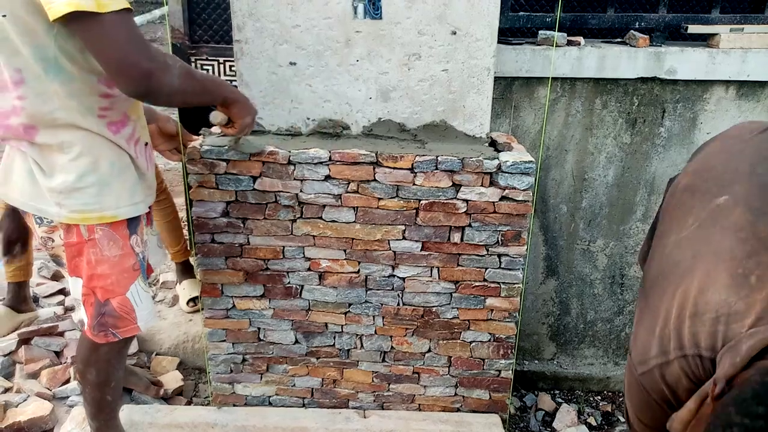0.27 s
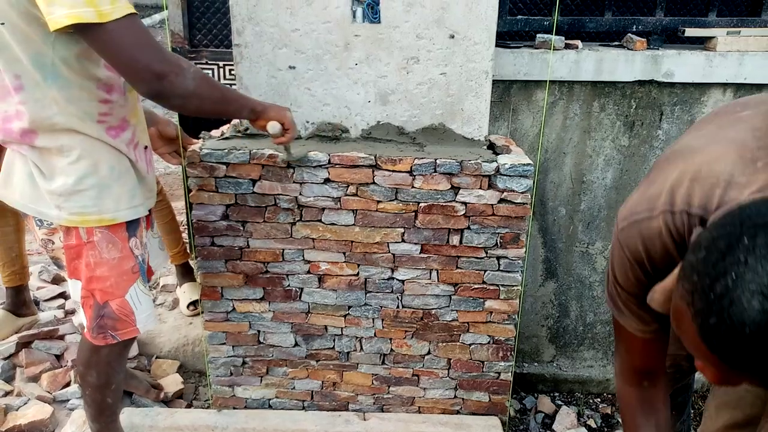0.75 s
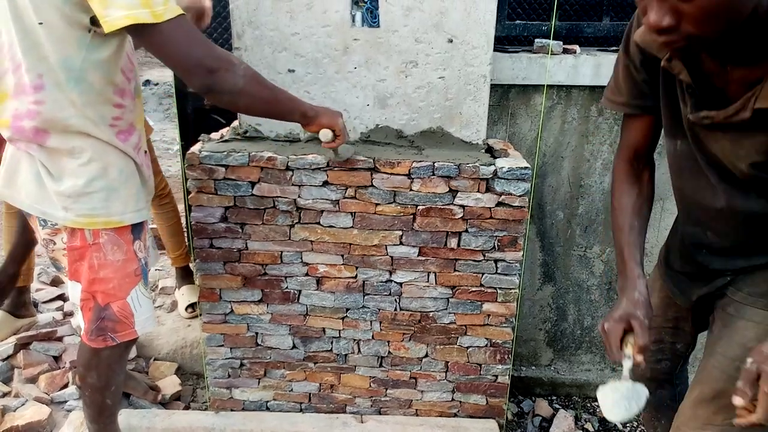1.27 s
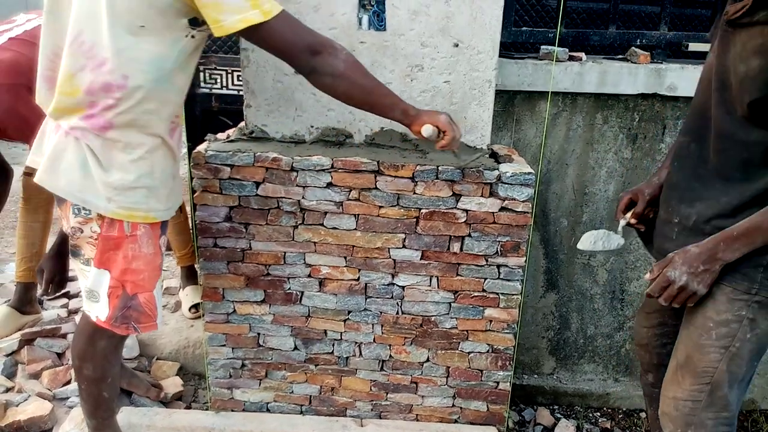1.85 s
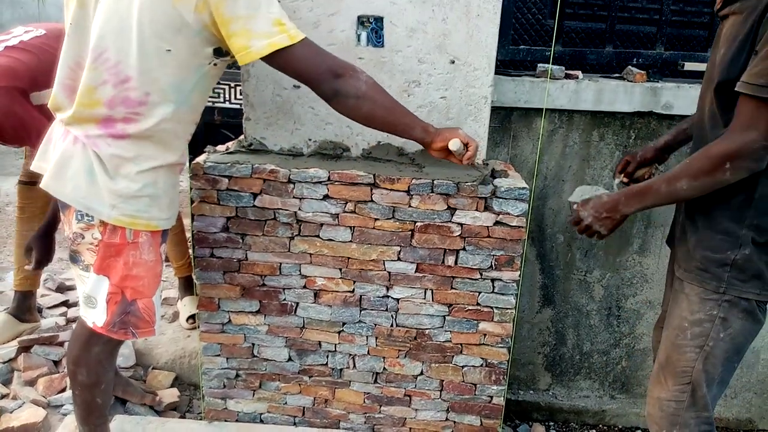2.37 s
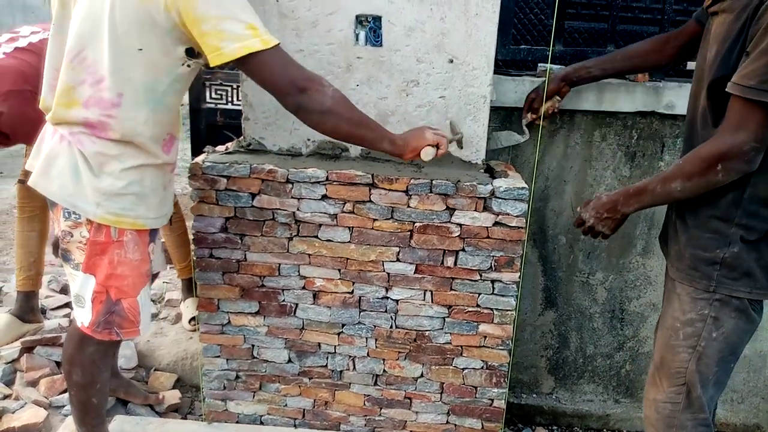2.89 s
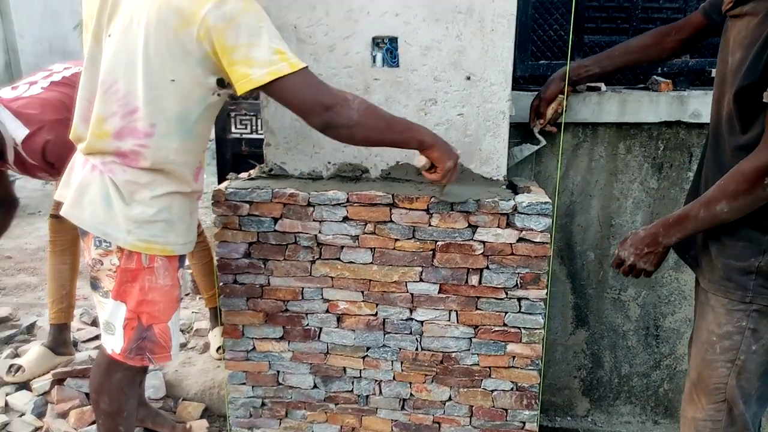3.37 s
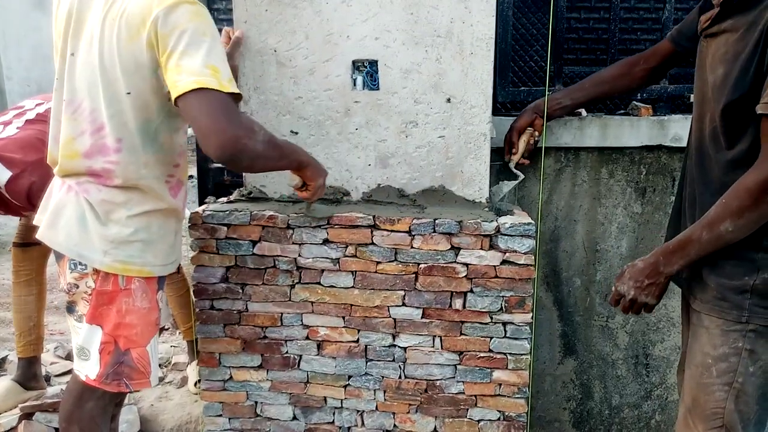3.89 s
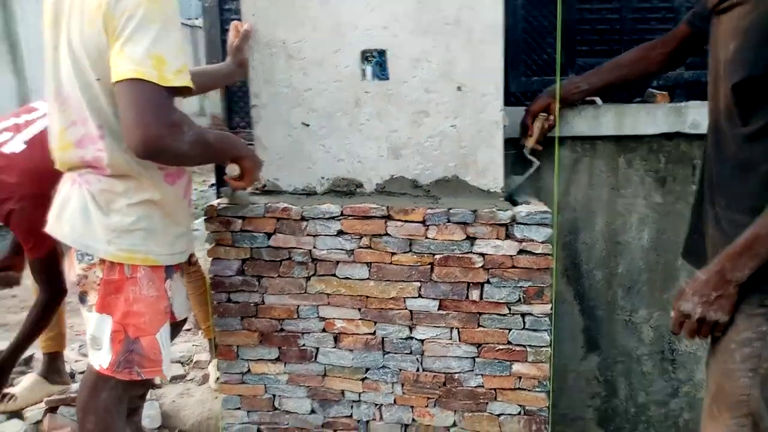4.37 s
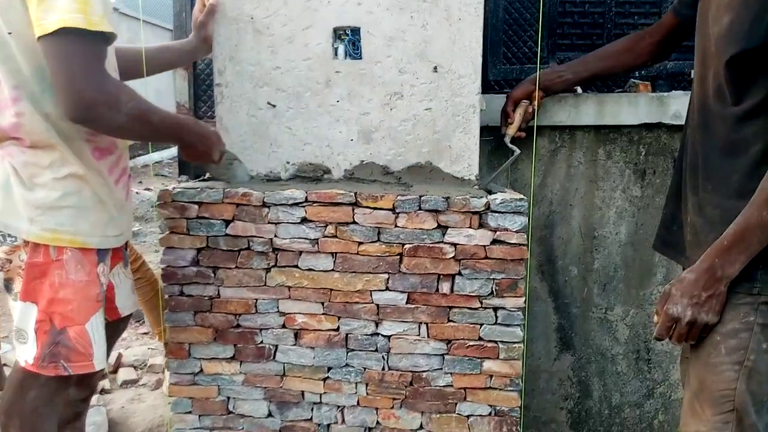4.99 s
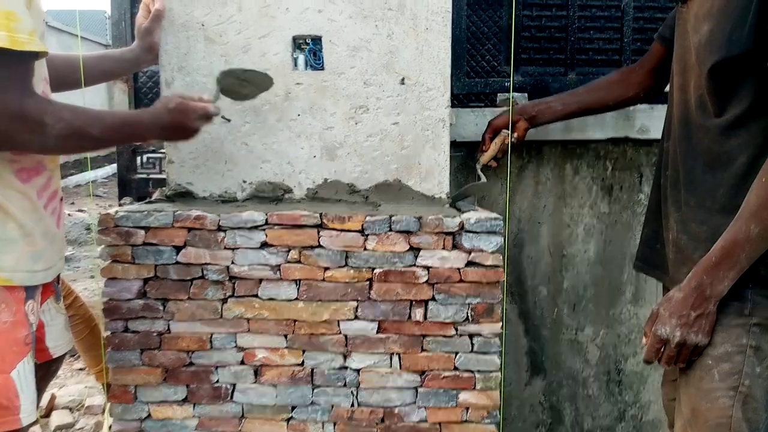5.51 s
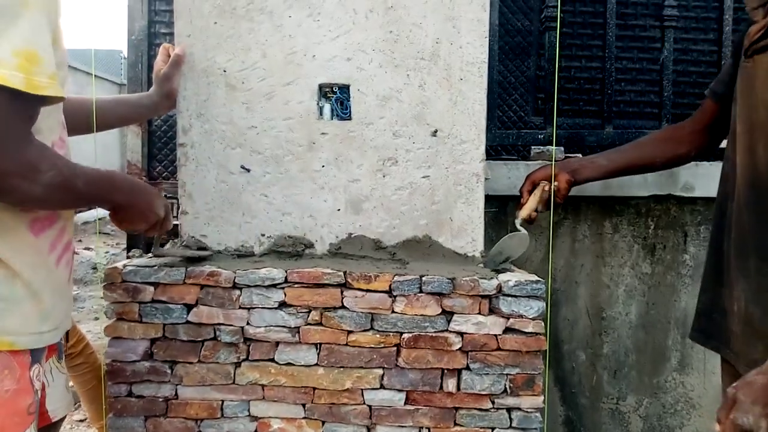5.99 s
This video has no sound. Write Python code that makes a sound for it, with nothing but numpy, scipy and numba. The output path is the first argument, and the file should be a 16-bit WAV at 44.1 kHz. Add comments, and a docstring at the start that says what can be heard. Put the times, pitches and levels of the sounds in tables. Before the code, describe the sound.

Close by in a walled yard, a steel trowel sweeps and scrapes through wet, sandy mortar, and lumps plop. After a second, steel taps on stone about three times a second, including four hard blows with a bright echo. Loose stones clack and one rocks with a clunk. Near the end the blade rings and squeaks over bare stone. Small birds chirp, faint bleats come late, and wind rumbles on the microphone.

```python
"""A walled yard; low wind buffets and handling thumps rumble on the stereo microphone. Close by, a mason
works mortar along a stone-clad pillar: his steel trowel sweeps the paste and bites into sand; lumps plop.
After a second, steel taps on stone about three times a second and small birds chirp farther off. Four
hard blows duck the limiter, each leaving a bright echo, while loose stones clack and one rocks with a
clunk. Late on come faint, distant bleats, and the blade sings and squeaks as it drags over bare stone."""
import sys
import numpy as np
from scipy import signal
from scipy.fft import rfft, irfft
from scipy.io import wavfile
from scipy.ndimage import uniform_filter1d
from numba import njit

SR = 44100
rng = np.random.default_rng(int(sys.argv[2]) if len(sys.argv) > 2 else 0)


def file_out(sig):
    """Save sig as 16-bit WAV at sys.argv[1]."""
    # one column per channel
    cols = np.atleast_2d(sig).T
    # limit, then scale
    lim = np.clip(cols, -1, 1)
    pcm = np.round(lim * 32767).astype(np.int16)
    wavfile.write(sys.argv[1], SR, pcm)


N = 275625
TIME = np.arange(N) / SR

# Hard blows on the masonry. Each row: start in seconds, relative level in dB, body over hiss in dB,
# level of the bright echo in dB, extra on its lowest band in dB.
BLOWS = [(1.5, -1.5, -6, -47, -4), (2.284, 0.5, -1.5, -23.5, -12), (3.043, 0, -4, -25.5, 4.5),
         (3.777, 4, -5, -28, -3)]


def undb(db):
    """Decibels to gain."""
    return 10 ** (np.asarray(db) / 20)


def unit(x):
    """Scale to rms 1."""
    return x / np.sqrt(np.mean(x ** 2))


def curve(rows):
    """Join (seconds, value) rows by straight lines."""
    return np.interp(TIME, *np.transpose(rows))


def add(track, s, sound):
    """Mix a sound into a track from s seconds on."""
    i = int(s * SR)
    track[..., i:i + sound.shape[-1]] += sound[..., :N - i]


def excerpt(x, s, samples):
    """A stretch of a signal from s seconds on."""
    return x[..., int(s * SR):][..., :samples]


def butter(x, order, hz, kind):
    """Butterworth filter."""
    return signal.sosfilt(signal.butter(order, hz, kind, fs=SR, output="sos"), x)


def convolve(x, response):
    """Pass each channel through a response."""
    return signal.fftconvolve(np.atleast_2d(x), np.atleast_2d(response), axes=-1)[:, :x.shape[-1]]


def colour(x, points, size=2048):
    """Causal filter of unit energy with the given (Hz, dB) shape."""
    hz, db = np.transpose(points)
    bin_hz = np.arange(size // 2 + 1) * SR / size
    log_gain = np.log(undb(np.interp(np.log(bin_hz + 1), np.log(hz), db)))
    cepstrum = irfft(log_gain)[:size // 2]
    cepstrum[1:] *= 2
    response = irfft(np.exp(rfft(cepstrum, size)))
    return convolve(x, response / np.linalg.norm(response))


def walk(rate):
    """Random drift of rms 1 that turns about `rate` times a second."""
    k = int(SR / rate)
    return unit(uniform_filter1d(np.repeat(rng.standard_normal(N // k + 1), k), k)[:N])


def pan(db):
    """Gains of constant power, as a column; db is left minus right."""
    return unit(undb([[db / 2], [-db / 2]]))


def thuds(rows, cycles, attack, size=8192):
    """Soft impacts from (seconds, Hz, peak dB) rows: a damped swing that dies within a few cycles."""
    out, t = np.zeros(N), TIME[:size]
    for s, hz, db in rows:
        swing = np.sin(2 * np.pi * hz * t) * (1 - np.exp(-hz * t / attack)) * np.exp(-hz * t / cycles)
        add(out, s, undb(db) * swing / abs(swing).max())
    return out


def calls(rows, quaver, quaver_rate, sag=0.045, flutter_db=3):
    """One quavering, sinking partial for each (seconds, length, Hz, dB) row."""
    out = np.zeros(N)
    waver = 1 + quaver * walk(quaver_rate)
    for s, length, hz, db in rows:
        along = np.linspace(0, 1, int(length * SR))
        pitch = hz * excerpt(waver, s, len(along)) * (1 - sag * (along - .5))
        arch = np.sqrt(2 * abs(np.sin(np.pi * along)))
        add(out, s, undb(db) * arch * np.sin(2 * np.pi * np.cumsum(pitch) / SR))
    return out * undb(flutter_db * walk(30))


def outdoors(rumble_db=6, swell_db=2, apart=0.87):
    """Soft air, wind buffets and handling thumps, and a low rumble partly alike in both channels."""
    # Spectra of the air and the rumble. Each row: frequency in Hz, density in dB.
    air_colour = [(120, 0), (200, -8.5), (400, -11.5), (650, 5.5), (900, 0), (1200, 3), (2400, -6),
                  (4300, -7), (5700, -2), (7100, -2), (8200, -14.5), (10500, -36), (17000, -62)]
    rumble_colour = [(20, -47), (40, -21), (55, -1), (90, -5), (122, 3.5), (165, -5), (250, -22),
                     (500, -33), (2000, -83)]
    # Their rise and fall. Each row: time in seconds, relative level in dB.
    air_level = [(.2, -48.5), (1, -52), (1.14, -52), (1.28, -62), (1.9, -48), (2.8, -54), (4.4, -52),
                 (4.62, -53), (5.2, -51.5), (5.48, -50.5), (5.82, -50.5), (6.25, -48)]
    rumble_level = [(0.35, -61), (0.61, -55.5), (0.94, -62.5), (1.45, -51), (1.63, -62.5), (2.35, -61.5),
                    (2.9, -50.5), (3.17, -49.5), (3.64, -48), (3.95, -57), (4.21, -56), (4.31, -51),
                    (4.46, -66.5), (4.62, -64), (5.02, -52.5), (5.13, -58), (5.62, -61), (6.25, -60)]
    # Wind and handling on the microphone. Each row: start in seconds, pitch in Hz, relative peak in dB.
    thumps = [(1.05, 121, -36.5), (1.41, 107, -32), (1.945, 125, -35), (2.67, 136, -43), (3.1, 119, -33),
              (3.285, 120, -32), (3.47, 97, -31.5), (3.55, 110, -31), (4.635, 133, -37.5), (5.02, 124, -39),
              (5.08, 121, -35), (5.53, 130, -37), (6.12, 98, -38)]
    air = colour(rng.standard_normal((2, N)), air_colour)
    air *= undb(curve(air_level) + 2.1 * walk(8.7))
    noise = unit(rng.standard_normal(N) + apart * rng.standard_normal((2, N)))
    rumble = colour(noise, rumble_colour, size=16384)
    rumble *= undb(curve(rumble_level) + rumble_db + swell_db * walk(6.4))
    return air * pan(db=4.5) + (rumble + thuds(thumps, cycles=2.5, attack=0.49)) * pan(db=7)


def sand(rate, spread_db):
    """Grains crack one after another: many small, a few large."""
    place, size, sign = rng.random((int(rate * N / SR), 3)).T
    strength = np.minimum(-np.log(1 - size), 5)
    cracks = undb(spread_db * strength) * np.sign(sign - .5)
    return unit(np.bincount((place * N).astype(int), cracks, N))


def shifting(x, shift_db=3.5, size=512):
    """The contact moves from stone to stone, so resonances come and go within hundredths of a second."""
    spectra = signal.stft(x, nperseg=size)[2]
    patches = uniform_filter1d(rng.standard_normal(spectra.shape[1:]), size=6, axis=0)
    swell = unit(uniform_filter1d(patches, size=3, axis=1))
    return signal.istft(spectra * undb(shift_db * swell), nperseg=size)[1][:, :N]


def grit(rate, spread_db, shift_db=3.5):
    """Sand cracks under the damped blade; the channels share some grains and each has its own."""
    # Resonances of the pressed blade. Each row: frequency in Hz, width in Hz, gain in dB.
    pressed = [(1540, 72, -7), (2344, 190, -3), (2896, 76, -3.5), (3797, 150, -4.5), (6490, 410, -2)]
    # Spectrum of sand crushed under steel. Each row: frequency in Hz, density in dB.
    crushed = [(100, -26), (400, -35.5), (850, -10), (1180, -14), (1500, -7.5), (2300, -7.5), (3700, -6),
               (4700, -5.5), (5700, -0.5), (6800, -1), (7600, -11), (8600, -28), (15000, -39.5),
               (17000, -15)]
    shared = sand(rate, spread_db)
    grains = shifting(np.stack([shared + sand(rate, spread_db) for _ in range(2)]), shift_db)
    steel = sum(undb(db) * signal.lfilter(*signal.iirpeak(hz, hz / width, fs=SR), grains)
                for hz, width, db in pressed)
    return unit(colour(grains + steel, crushed))


def pressure(rise_s, hold_s, release_s):
    """One contact builds, holds and lets go."""
    t = TIME[:int((hold_s + 10 * release_s) * SR)]
    return (1 - np.exp(-t / rise_s)) * np.exp(-np.maximum(t - hold_s, 0) / release_s)


def tilt(x, body_db, split_hz=3300, shade_db=4.5):
    """Firm contact favours the body below the split, loose sand the hiss above; the body leans left."""
    low, high = butter(x, 3, split_hz, "low"), butter(x, 3, split_hz, "high")
    body, hiss = pan(body_db)
    return body * low * pan(shade_db) + hiss * high * pan(-shade_db)


def contact(grains, s, shape, body_db):
    """A stretch of grains, coloured by the firmness of the contact and shaped by its pressure."""
    sound = tilt(excerpt(grains, s, len(shape)), body_db)
    return unit(sound * shape[:sound.shape[1]]) * np.sqrt(np.mean(shape ** 2))


def slips(rate, decay_s, floor, spread_db=3):
    """Stick-slip: the steel lets go at uneven intervals, and each jerk dies away quickly."""
    gap, size = rng.standard_normal((int(2 * rate * N / SR), 2)).T
    when = (np.cumsum(np.exp(.5 * gap)) / rate * SR).astype(int)
    jerks = np.bincount(when, undb(spread_db * size), N)[:N]
    return unit(floor + signal.lfilter([1], [1, -np.exp(-1 / (decay_s * SR))], jerks))


def squelch(low_hz=230, high_hz=1150, count=2200, spread_db=2):
    """Tiny air pockets burst in the wet paste."""
    when, pitch, size = rng.random((count, 3)).T
    hz = low_hz * (high_hz / low_hz) ** pitch
    db = spread_db * np.minimum(-np.log(1 - size), 3)
    return unit(thuds(zip(when * N / SR, hz, db), cycles=1.26, attack=0.47, size=2048))


def smoothing(wobble_db=4):
    """The flat of the blade glides in jerks: firm sweeps rasp, loose ones hiss, the paste squelches."""
    # Each row: start and length in seconds, then crackle, firmness and squelch in dB.
    sweeps = [(0.137, 0.12, -40.5, -1.5, -57.5), (0.274, 0.13, -37.5, 1, -44.5),
              (0.412, 0.38, -36.5, 0.5, -52), (1.282, 0.11, -36.5, -1.5, -63), (1.538, 0.087, -34, 4, -68),
              (1.751, 0.13, -38, 4, -52.5), (1.926, 0.16, -51, 3, -55), (2.011, 0.25, -44.5, -1.5, -58),
              (2.34, 0.045, -35, 2.5, -55), (2.727, 0.054, -39.5, -2, -52.5),
              (2.966, 0.015, -45, -9, -41.5), (3.075, 0.1, -33, -2, -46), (3.204, 0.28, -39, -0.5, -60),
              (3.586, 0.25, -41.5, 0.5, -61), (3.797, 0.125, -29.5, 0.5, -44),
              (4.049, 0.1, -33.5, -1.5, -58), (4.37, 0.17, -56, 6.5, -54), (4.648, 0.2, -46, 2.5, -64),
              (5.072, 0.084, -45.5, 2.5, -54.5), (5.99, 0.04, -40.5, 3, -43), (6.07, 0.068, -38, 1, -64)]
    firm, loose, wet = controls = np.zeros((3, N))
    for s, length, crackle_db, firm_db, squelch_db in sweeps:
        strength = undb([[crackle_db + firm_db], [crackle_db - firm_db], [squelch_db]])
        add(controls, s, strength * pressure(rise_s=0.0071, hold_s=length, release_s=0.029))
    grains = grit(rate=7000, spread_db=3, shift_db=4)
    wobble = undb(wobble_db * walk(45))
    rasp = tilt(grains, body_db=37) * firm * wobble
    hiss = tilt(grains, body_db=-21.5) * loose / wobble
    crackle = (rasp + hiss) * slips(rate=70, decay_s=0.006, floor=0.3) / np.sqrt(2)
    return (crackle + wet * squelch()) * pan(db=7)


def strokes(gain_db=-1):
    """The edge sticks and slips as it bites into coarse sand."""
    # Each row: start and length in seconds, relative level in dB, body over hiss in dB.
    bites = [(0.196, 0.0041, -29, -9), (0.425, 0.0068, -19, -13), (0.438, 0.0086, -20.5, -6),
             (.449, 0.0078, -21.5, -4), (0.481, 0.034, -29, 0.5), (0.576, 0.004, -16.5, -1),
             (0.598, 0.0056, -22, 3), (0.604, 0.01, -28, 3), (0.655, 0.003, -18, 0.5),
             (0.671, 0.0056, -23, -1), (0.691, .006, -17, -1.5), (0.732, 0.0082, -21, -4),
             (0.848, 0.028, -23.5, -3), (0.874, 0.011, -19, -8), (0.89, 0.016, -20, -6),
             (0.912, 0.0035, -21.5, 0), (0.916, .006, -20.5, -9), (0.932, 0.0066, -16.5, -4.5),
             (1.291, 0.0077, -24.5, -9), (1.303, 0.0054, -26, -3.5), (1.361, 0.0055, -20.5, -2.5),
             (1.38, 0.013, -26, 1.5), (1.403, 0.0046, -14.5, -4), (1.416, 0.0094, -18.5, -2),
             (1.45, 0.009, -16, 0), (1.489, 0.0058, -25, 3), (1.671, 0.0093, -17.5, -8),
             (2.068, 0.0065, -22.5, 2), (3.017, 0.0047, -23, -11), (3.269, 0.0034, -28, -3),
             (3.234, 0.0068, -13.5, -4.5), (3.289, 0.0078, -19, -13), (3.306, 0.007, -23.5, -16),
             (3.351, 0.0021, -17, -1), (3.367, 0.0038, -16.5, -4.5), (3.392, 0.0021, -13, -9),
             (3.416, 0.017, -22.5, 0.5), (3.631, 0.011, -21, 0), (3.678, 0.004, -18, -8),
             (3.706, 0.0082, -16.5, -5), (3.723, 0.012, -21.5, 2), (3.756, .0049, -16.5, 1),
             (3.932, .002, -22, -6), (3.979, 0.033, -22.5, 1.5), (4.111, 0.013, -23.5, -5.5),
             (4.17, 0.0076, -20, -4.5), (5.877, 0.0021, -21, 10), (6.073, 0.0061, -21.5, -0.5),
             (6.158, 0.017, -30.5, 8)]
    out = np.zeros((2, N))
    jerks = slips(rate=110, decay_s=0.004, floor=0.45)
    grains = grit(rate=12000, spread_db=1.7, shift_db=3.8) * jerks
    for s, length, db, body_db in bites:
        press = pressure(rise_s=0.00038, hold_s=length, release_s=0.0025)
        add(out, s, contact(grains, s, press, body_db) * undb(db + gain_db))
    return out * pan(db=9)


def mortar():
    """Well to the left, wet lumps plop down and the paste sucks at the blade with a falling note."""
    # Each row: start in seconds, pitch in Hz, relative peak in dB.
    plops = [(.333, 1100, -25), (.377, 860, -24.5), (2.871, 226, -22.5), (2.975, 590, -23),
             (3.045, 192, -12.5), (3.047, 477, -13), (3.099, 418, -21.5), (3.779, 129, -11.5),
             (4.2, 296, -21), (4.2475, 397, -16), (4.2845, 590, -15.5), (4.297, 365, -21.5)]
    # Each row: start and length in seconds, pitch in Hz, relative level in dB.
    sucks = [(.374, 0.0084, 790, -39), (.877, 0.042, 834, -39.5), (.919, 0.02, 905, -37),
             (3.097, 0.02, 625, -38.5)]
    sucking = calls(sucks, quaver=0.08, quaver_rate=350, sag=0.25)
    return (thuds(plops, cycles=0.67, attack=0.1) + sucking) * pan(db=15.5)


def taps(gain_db=5.5, low_cut_hz=600, tick_db=-10):
    """Steel ticks on stone and crushes a cluster of grains, too lightly to move the masonry."""
    # Each row: start in seconds, relative level in dB, body over hiss in dB.
    light_hits = [(1.043, -27.5, 6.5), (1.72, -22, 7), (2.035, -22, 3), (2.336, -21.5, 6),
                  (2.634, -25.5, 9.5), (2.926, -26.5, 14.5), (3.207, -20, -3), (3.493, -20, 8.5),
                  (4.042, -22.5, 12), (4.325, -26.5, 14), (4.985, -27, 12.5), (5.276, -21, 3.5),
                  (5.563, -18.5, 2.5), (5.638, -34, 10), (5.86, -20.5, 9.5), (6.175, -19.5, 2.5)]
    out = np.zeros((2, N))
    grains = butter(grit(rate=9900, spread_db=2.5, shift_db=2.5), 2, low_cut_hz, "high")
    crack = rng.standard_normal((2, N))
    press = pressure(rise_s=0.00044, hold_s=0.0034, release_s=0.0027)
    snap = pressure(rise_s=0.00005, hold_s=0.00014, release_s=0.0005)
    for s, db, body_db in light_hits:
        add(out, s, contact(grains, s, press, body_db) * undb(db + gain_db))
        add(out, s, contact(crack, s, snap, body_db=0) * undb(db + gain_db + tick_db))
    return out * pan(db=4)


def birds(fall=0.065, length_s=0.0226, rough=0.0083):
    """Small birds far off: high, slightly hoarse chirps that slide down, and thin buzzing calls."""
    # Each row: start in seconds, opening pitch in Hz, relative peak in dB.
    chirps = [(1.102, 5960, -37), (1.136, 5860, -42), (4.52, 5860, -44), (4.572, 5880, -44),
              (4.6, 5680, -42), (4.652, 5870, -39.5), (4.682, 5870, -40), (5.675, 5800, -42.5),
              (5.7, 5350, -49), (5.725, 5960, -42), (5.738, 5400, -47), (5.762, 5930, -37.5),
              (5.775, 5330, -40)]
    # Each row: start and length in seconds, pitch in Hz, relative level in dB.
    buzzes = [(1.265, 0.029, 7740, -51), (4.52, 0.065, 7060, -47), (5.38, 0.09, 7120, -50.5)]
    out, t = np.zeros(N), TIME[:int(length_s * SR)]
    waver = 1 + rough * walk(900)
    for s, hz, db in chirps:
        phase = np.cumsum(hz * excerpt(waver, s, len(t)) * (1 - fall * t / length_s)) / SR
        add(out, s, undb(db) * np.sin(np.pi * t / length_s) * np.sin(2 * np.pi * phase))
    return (out + calls(buzzes, quaver=0.062, quaver_rate=640)) * pan(db=-1)


def blows(gain_db=8, knock_db=-28, knock_band_hz=(90, 700)):
    """A hard blow crushes grit and also knocks the masonry."""
    out, grains = np.zeros((2, N)), grit(rate=9900, spread_db=1.5, shift_db=0.5)
    masonry = unit(butter(rng.standard_normal((2, N)), 2, knock_band_hz, "band"))
    press = pressure(rise_s=0.0022, hold_s=0.0035, release_s=0.0024)
    for s, db, body_db, _, _ in BLOWS:
        knock = contact(masonry, s, press, body_db=0) * undb(knock_db)
        add(out, s, (contact(grains, s, press, body_db) + knock) * undb(db + gain_db))
    return out * pan(db=5)


def bright_echo(t60_s=0.44):
    """A bright, ringing echo hangs in the yard after each hard blow, in a few narrow high bands."""
    # Each row: frequency in Hz, width in Hz, relative level in dB.
    echo_bands = [(5720, 110, -4.5), (6670, 370, 0.5), (7430, 48, -3), (11000, 220, -20.5),
                  (11230, 220, -22.5)]
    out, t = np.zeros((2, N)), TIME[:SR // 2]
    noise = rng.standard_normal((2, N))
    lowest, *upper = [undb(db) * unit(butter(noise, 2, (hz - width / 2, hz + width / 2), "band"))
                      for hz, width, db in echo_bands]
    for s, _, _, echo_db, lowest_db in BLOWS:
        tail = excerpt(lowest * undb(lowest_db) + sum(upper), s, len(t))
        add(out, s, tail * undb(echo_db - 60 * t / t60_s))
    return out * pan(db=-3)


def clacks(gain_db=4, band_ratio=1.51):
    """Loose stone meets stone: nearly all body, little hiss; bigger stones sound lower."""
    # Each row: start in seconds, relative level in dB, pitch in Hz, decay in seconds.
    collisions = [(1.617, -22, 2530, 0.0014), (1.683, -32.5, 1070, 0.0063), (2.034, -36.5, 1120, 0.0037),
                  (2.073, -38, 910, 0.011), (2.444, -32.5, 2350, 0.008), (2.786, -36.5, 1690, 0.002),
                  (2.843, -41.5, 2000, 0.0021), (2.868, -35, 1900, 0.0028), (2.879, -35, 1800, 0.0037),
                  (4.209, -19, 2540, 0.0084), (4.212, -29, 610, 0.0053), (4.265, -35, 1890, 0.004),
                  (4.382, -36, 1250, 0.004), (4.398, -40.5, 1070, 0.0062), (5.124, -33.5, 2000, 0.0032),
                  (5.134, -31, 1230, 0.0056), (5.891, -28.5, 2190, 0.0018), (5.928, -30, 2120, 0.0024)]
    out = np.zeros((2, N))
    grains = shifting(sand(rate=12000, spread_db=2.5) + rng.standard_normal((2, N)))
    for s, db, hz, decay_s in collisions:
        body = butter(grains, 2, (hz / band_ratio, hz * band_ratio), "band")
        press = pressure(rise_s=0.00038, hold_s=0.0017, release_s=decay_s)
        add(out, s, contact(body, s, press, body_db=2.5) * undb(db + gain_db))
    return out * pan(db=3)


def clunks(rise_s=0.0006):
    """A rocking stone rings briefly and hollowly, at a different pitch on each contact."""
    # Each row: start in seconds, relative peak in dB, pitch as a ratio to the modes below.
    rockings = [(2.868, -26.5, 0.63), (2.879, -25, .69), (4.208, -16.5, 0.96), (4.213, -14.5, 1.02),
                (4.224, -20, 1.05)]
    # Each row: frequency in Hz, decay in seconds, relative level in dB.
    stone_modes = [(300, 0.0057, 0), (890, 0.0051, -5.5), (1564, 0.005, 1), (2137, .008, -3.5)]
    out, t = np.zeros(N), TIME[:SR // 8]
    for s, db, pitch in rockings:
        ring = sum(undb(mode_db) * np.sin(2 * np.pi * hz * pitch * t) * np.exp(-t / decay_s)
                   for hz, decay_s, mode_db in stone_modes)
        ring *= 1 - np.exp(-t / rise_s)
        add(out, s, undb(db) * ring / abs(ring).max())
    return out * pan(db=8)


def livestock():
    """Faint bleats far off to the left, each heard as its strongest partial."""
    # Each row: start and length in seconds, that partial in Hz, relative level in dB.
    bleats = [(4.33, .16, 965, -56), (4.54, .24, 945, -53), (4.87, .14, 1060, -52.5), (5.3, .12, 1000, -55),
              (5.62, .19, 905, -53), (5.63, .11, 1070, -52)]
    return calls(bleats, quaver=0.03, quaver_rate=200) * pan(db=12)


def singing_blade(rise_s=0.0009, ring_s=0.035, fade_s=0.005, catch_s=0.007,
                  rasp_db=-10, swell_db=3.5, bend=.005, strain=.014):
    """Each catch on stone rasps and rings the plate, sharp at first; the part touching picks the modes."""
    # Each row: frequency and width in Hz, then level in dB when dragged on the tip, edge and flat.
    blade_modes = [(432, 47, -16, -24, -5.5), (1020, 65, -2.5, -16, -13), (1365, 16, -28, -29, 0.5),
                   (1684, 100, 1, -0.5, -8), (1880, 15, -12, -19, -1), (2844, 23, -2.5, -1, 0),
                   (3420, 20, -18, -12, -23), (3560, 51, -12, -27, -21), (4370, 40, -13, -18, -6),
                   (3880, 25, -12, -8, -8), (5080, 20, -20, -22, -9), (4950, 83, -3.5, -10, -6),
                   (6500, 30, -14, -16, -14), (6400, 49, -7, -6, -6), (7100, 32, -12, -22, -18)]
    # Each row: start and length in seconds, relative level in dB, part that touches.
    catches = [(4.678, .055, -36.5, "tip"), (4.829, 0.034, -27.5, "tip"), (5.031, 0.029, -24, "edge"),
               (5.063, 0.026, -27, "edge"), (5.089, 0.028, -28.5, "edge"), (5.947, 0.032, -25, "flat"),
               (5.976, 0.025, -24.5, "flat"), (6.004, 0.036, -29.5, "flat")]
    out, t = np.zeros((2, N)), TIME[:SR // 5]
    hz, width, tip, edge, flat = np.transpose(blade_modes)
    weights = {"tip": undb(tip), "edge": undb(edge), "flat": undb(flat)}
    grains = grit(rate=4800, spread_db=-1)
    swells = undb(swell_db * np.stack([walk(45) for _ in hz]))  # each mode comes and goes on its own
    flex = bend * walk(35)  # the plate flexes under the hand and bends all its pitches
    catch = np.exp(-t / catch_s)
    for s, length, level_db, part in catches:
        # the shifting contact nudges each mode's phase, which widens its line
        nudges = rng.standard_normal((len(hz), len(t))) * np.sqrt(np.pi * width / SR)[:, None]
        bent_time = np.cumsum(1 + strain * catch + excerpt(flex, s, len(t))) / SR
        phase = 2 * np.pi * hz[:, None] * bent_time + np.cumsum(nudges, axis=1)
        modes = np.sin(phase) * excerpt(swells, s, len(t))
        release = np.exp(-np.maximum(t - length, 0) / fade_s)
        press = (1 - np.exp(-t / rise_s)) * np.exp(-t / ring_s) * release
        ring = unit(weights[part] @ modes * press) * np.sqrt(np.mean(press ** 2))
        rasp = contact(grains, s, press * (.5 + catch), body_db=0) * undb(rasp_db)
        add(out, s, (ring * pan(db=9) + rasp * pan(db=2)) * undb(level_db))
    return out * undb(1.5 * walk(300))  # the level flickers


def squeaking_corner():
    """A corner of the blade squeaks on one high note."""
    # Each row: start and length in seconds, pitch in Hz, relative level in dB.
    squeaks = [(5.997, 0.024, 4850, -38.5), (6.157, .014, 5060, -22)]
    return calls(squeaks, quaver=0.009, quaver_rate=440) * pan(db=5)


def yard(x, echo_db, scatter_s=0.0093, scatter_db=-11.5, build_s=0.0075, t60_s=0.59, tail_db=-13):
    """Direct sound, a quick scatter off the pillar, and the slow echo between the house walls."""
    # Spectrum of the echo. Each row: frequency in Hz, density in dB.
    echo_colour = [(100, -13), (450, -2.5), (850, 4), (1200, -3), (2300, -2.5), (4400, -3), (7000, -4.5),
                   (8500, -10.5), (15000, -10)]
    t = TIME[:SR]
    direct = np.stack([np.roll(x[0], -16), np.roll(x[1], 48)])  # the left side hears it first
    scatter = rng.standard_normal((2, SR)) * np.exp(-t / scatter_s) * (t > .004)
    tail = colour(rng.standard_normal((2, SR)), echo_colour)
    tail *= undb(-60 * t / t60_s) * (1 - np.exp(-t / build_s))
    echo = (undb(scatter_db) * unit(scatter) + undb(tail_db) * unit(tail) / 2) / np.sqrt(SR)
    return direct + convolve(x, echo) * undb(echo_db + 2.8 * walk(60))  # the echo flutters


def scene():
    """Singing steel, mortar and the rocking stone arrive driest; the far animals carry the most echo."""
    singing = singing_blade() + squeaking_corner()
    paste = mortar()
    animals = birds() + livestock()
    work = taps() + blows() + bright_echo() + clacks() + strokes() + smoothing()
    at_pillar = yard(work, echo_db=0.5) + yard(singing + paste + clunks(), echo_db=-7.5)
    return at_pillar + yard(animals, echo_db=2.5) + outdoors()


@njit
def follow(x, hold, release):
    """Peak follower: jumps up at once, holds, then falls."""
    out, peak, wait = np.empty(len(x)), 0., 0.
    for i in range(len(x)):
        wait -= 1
        if x[i] > peak:
            peak, wait = x[i], hold
        elif wait < 0:
            peak *= 1 - release
        out[i] = peak
    return out


def record(dry, start_s=0.15, ceiling=2.55, hold_s=0.042, release_s=0.025, low_cut_hz=47, top_hz=16000):
    """The recorder opens, drops the deepest bass, limits and clips the hardest blows, and cuts the top."""
    heard = butter(dry, 3, low_cut_hz, "high")
    peak = follow(abs(heard).max(axis=0), float(hold_s * SR), 1 / (release_s * SR))
    fade_in = np.clip((TIME - start_s) / 0.03, 0, 1)
    limited = heard / np.maximum(peak / ceiling, 1) * fade_in
    top_cut = signal.ellip(8, .2, 70, top_hz, fs=SR, output="sos")
    return signal.sosfilt(top_cut, np.clip(limited, -1, 1))


dry = scene()
out = record(dry)
file_out(out)
```